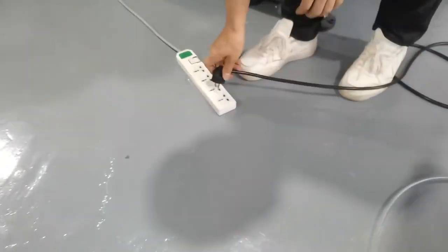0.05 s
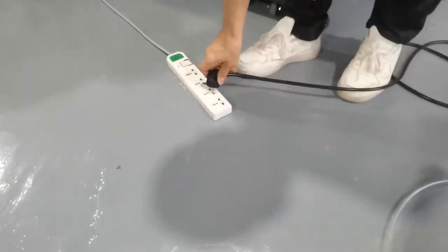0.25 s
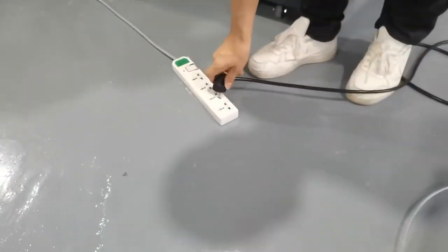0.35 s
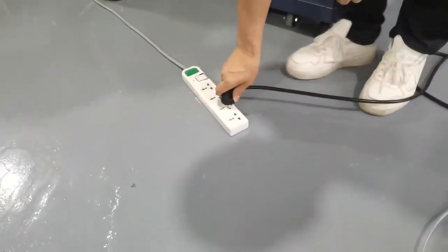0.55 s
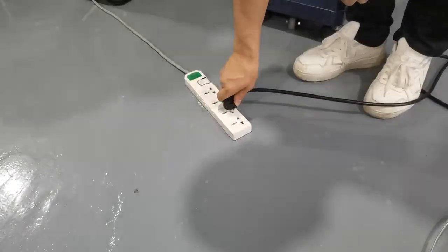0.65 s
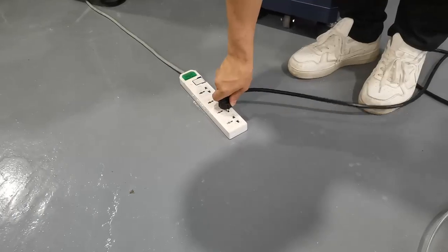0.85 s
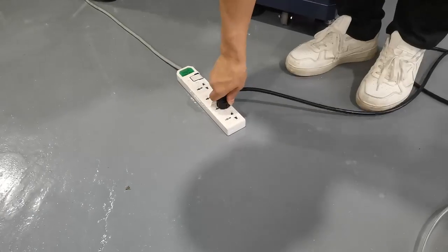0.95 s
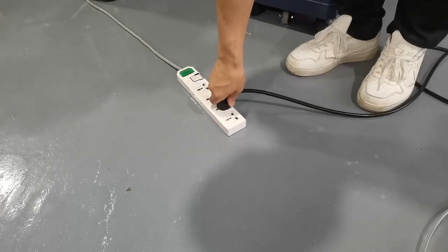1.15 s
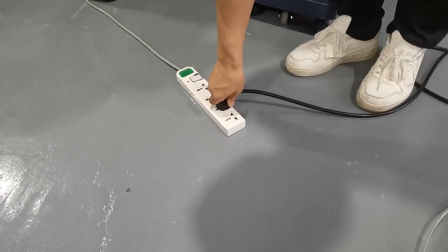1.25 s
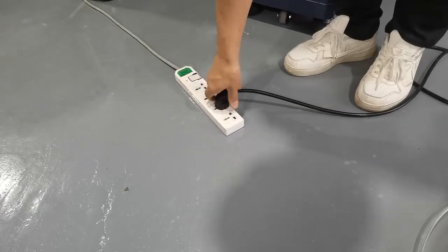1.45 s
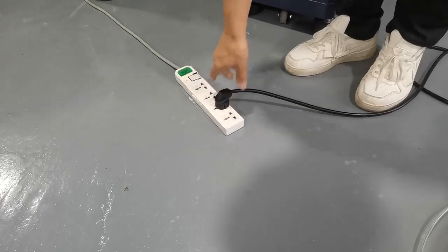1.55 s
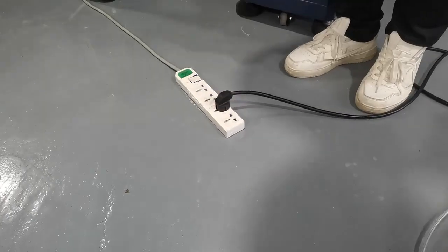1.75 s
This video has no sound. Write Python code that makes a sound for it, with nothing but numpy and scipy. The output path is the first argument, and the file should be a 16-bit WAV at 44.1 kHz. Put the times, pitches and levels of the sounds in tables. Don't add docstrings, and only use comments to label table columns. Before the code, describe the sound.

A plug scrapes and taps against a plastic power strip on a hard floor, then seats with two sharp, bright snaps that ring in a bare hall; low ventilation rumble, close phone microphone in stereo.

```python
import sys
import numpy as np
from scipy import signal
from scipy.fft import rfft, irfft, next_fast_len
from scipy.io import wavfile
from scipy.ndimage import uniform_filter1d, map_coordinates

SR = 44100
rng = np.random.default_rng(int(sys.argv[2]) if len(sys.argv) > 2 else 0)


def log_audio(samples):
    frames = np.atleast_2d(samples).T
    limited = np.clip(frames, -1, 1)
    pcm = np.round(limited * 32767).astype(np.int16)
    wavfile.write(sys.argv[1], SR, pcm)


def attenuation_scalar(level_db):
    decades = np.asarray(level_db, float) / 20
    return 10 ** decades


N = 79380


def unit(x):
    return x / np.sqrt(np.mean(x ** 2) + 1e-20)


def along(points, hz):
    f, v = np.transpose(points)
    return np.interp(np.log(hz + 1), np.log(f + 1), v)


def bumps(rows, hz):
    return sum(db / (1 + (2 * (hz - centre) / width) ** 2) for centre, width, db in rows)


def curves(rows, before_db=None):
    s, *columns = np.transpose(rows)
    return [np.interp(np.arange(N) / SR, s, c, left=before_db) for c in columns]


def sides(pan_db):
    return attenuation_scalar(np.array([pan_db / 2, -pan_db / 2]))


def wobble(rate):
    knots = rng.standard_normal(int(N * rate / SR) + 4)
    return map_coordinates(knots, [np.arange(N) * rate / SR])


def filtered(x, response):
    m = next_fast_len(N + 8192)
    return irfft(rfft(x, m) * response(np.fft.rfftfreq(m, 1 / SR)), m)[..., :N]


def add_at(out, start_s, sound):
    out[:, round(start_s * SR):][:, :sound.shape[1]] += sound


# frequency in Hz, likeness from 0 to 1.
ALIKE = [(60, 1), (150, 0.95), (400, 0.77), (1200, 0.12), (10000, 0.032)]


def rush(colour_db, patchy_db, grain=1):
    z = signal.stft(rng.standard_normal((2, N)) * grain, nperseg=512)[2]
    patches = uniform_filter1d(rng.standard_normal(z.shape[1:]), size=6, axis=0)
    patches = unit(uniform_filter1d(patches, size=10, axis=1))
    pair = signal.istft(z * attenuation_scalar(patchy_db * patches), nperseg=512)[1][:, :N]

    def mid_side_gain(hz):
        turn = np.arccos(np.clip(along(ALIKE, hz), 0, 1)) / 2
        return attenuation_scalar(colour_db(hz)) * [np.cos(turn), np.sin(turn)]

    mid, side = filtered(pair, mid_side_gain)
    return unit(np.array([mid + side, mid - side]))


def ring(modes, t, rise_s, spread):
    luck = rng.standard_normal((3, len(modes), 2, 1))
    hz, db, t60 = np.transpose(modes)[:, :, None, None]
    decay = attenuation_scalar(db + 0.77 * luck[0] - 60 * t / t60)
    tone = np.sin(2 * np.pi * hz * (1 + spread * luck[1]) * t + .5 * luck[2])
    return (decay * tone).sum(0) * (1 - np.exp(-t / rise_s))


# time in seconds, level in dB.
RUMBLE = [(0, -59.5), (.12, -56.5), (.25, -54), (.45, -62), (.58, -56.5), (.7, -57.5), (.8, -63),
          (.86, -73), (.96, -72.5), (1.05, -59.5), (1.075, -54), (1.15, -62.5), (1.24, -69), (1.38, -60.5),
          (1.55, -59), (1.63, -60), (1.72, -57), (1.8, -60)]
# frequency in Hz, level in dB per Hz.
RUMBLE_TONE = [(15, -13), (45, -9), (113, -9.5), (232, -9), (415, -12.5), (560, -21.5), (1400, -26),
               (3300, -63)]
# frequency in Hz, level over the rumble in dB.
HUM = [(110.5, 0), (165, -6.5), (418, -11), (836, -16)]
# time in seconds, level in dB.
FAN_LOAD = [(0, -13), (.2, -9), (.45, -1), (.7, 0.5), (1.05, 0), (1.3, -10.5), (1.45, 2), (1.58, 6),
            (1.8, 3)]


def ventilation():
    level_db, = curves(RUMBLE)
    load_db, = curves(FAN_LOAD)
    fan = 0
    for hz, db in HUM:
        strength = attenuation_scalar(db + 1.6 * wobble(7.54))
        cycles = np.cumsum(hz * (1 + 0.0081 * wobble(5.95))) / SR
        fan = fan + strength * np.sin(2 * np.pi * cycles)
    low = rush(lambda hz: along(RUMBLE_TONE, hz), patchy_db=1.5)
    air = attenuation_scalar(0.61 * wobble(14.0)) * low
    return attenuation_scalar(level_db) * (air + attenuation_scalar(load_db) * fan) * attenuation_scalar([[1.2], [-1.2]])


# time in seconds, level in dB.
HISS = [(0, -72), (.07, -66.5), (.7, -69), (.81, -71), (1.4, -61.5), (1.55, -58.5), (1.63, -66), (1.8, -69)]
# frequency in Hz, level in dB per Hz.
HISS_TONE = [(180, -20), (550, -8), (1660, -14.5), (3000, -8), (7000, -29), (12500, -58)]


def distant_air():
    level_db, = curves(HISS)
    return attenuation_scalar(level_db + wobble(2.0)) * rush(lambda hz: along(HISS_TONE, hz), patchy_db=1.0)


# time in seconds, level in dB, left-right difference in dB.
WASH = [(.835, -36, -12), (.88, -37, -10), (.95, -40, -8.5), (1.074, -42, -7), (1.08, -31, -23),
        (1.11, -32.5, -7), (1.16, -36, -8.5), (1.23, -38, -6.5), (1.3, -38, -5), (1.38, -43.5, -7),
        (1.47, -51, -4), (1.555, -55, -11), (1.61, -59, -10), (1.68, -49.5, -2.5), (1.74, -56, -6),
        (1.8, -60, -10)]
# frequency in Hz, level in dB per Hz.
WASH_TONE = [(290, -81), (560, -17), (910, -6), (1500, -7.5), (3300, -4), (7240, -6.5), (10500, -24),
             (12500, -35.5)]
# frequency in Hz, width in Hz, height in dB.
WASH_BODY = [(897, 140, 6.5), (2860, 690, 3.5), (7050, 250, 0), (10200, 2900, 2), (1166, 93, 5.5),
             (745, 76, 3.5)]


def hall():
    level_db, pan_db = curves(WASH, before_db=-95)
    noise = rush(lambda hz: along(WASH_TONE, hz) + bumps(WASH_BODY, hz), patchy_db=1.64)
    return attenuation_scalar(level_db - 2.64 + 0.66 * wobble(59.9)) * sides(pan_db) * noise


# time in seconds, level in dB.
CAVITY = [(.835, -49), (.86, -49), (.93, -56), (1.0, -50.5), (1.07, -50.5), (1.1, -52), (1.2, -58),
          (1.32, -52.5), (1.36, -61), (1.45, -81)]


def cavity():
    centre_hz, width_hz = 914, 110
    level_db, = curves(CAVITY, before_db=-95)

    def peak_db(hz):
        return -20 * np.log10(1 + (2 * (hz - centre_hz) / width_hz) ** 2)

    return attenuation_scalar(level_db) * rush(peak_db, patchy_db=0.8)


# start in seconds, level in dB,
# frequency in Hz, time to fade by 60 dB in seconds, left-right difference in dB.
TAPS = [(.1478, -33.5, 216, 0.013, -24), (.1478, -35, 470, 0.011, -15), (0.1995, -31, 1480, 0.0052, -38.5),
        (0.204, -52, 76, 0.046, -25), (.262, -51, 900, .03, -28), (.3275, -32.5, 4050, 0.013, -18.5),
        (0.3295, -34.5, 3300, 0.03, -23.5), (0.3334, -39.5, 3180, 0.12, -13),
        (0.5555, -33.5, 380, 0.012, 1), (0.7, -47.5, 77, 0.043, -7), (0.547, -40.5, 2010, 0.096, -17),
        (.575, -35.5, 720, 0.013, 9), (.606, -30, 2610, 0.0085, -21), (0.608, -34, 3390, 0.018, -16),
        (.609, -31.5, 830, 0.0071, 15), (1.074, -52.5, 45, 0.069, -25), (.8405, -41, 6600, 0.012, -8),
        (0.857, -38, 7400, 0.037, -14), (0.8308, -16.5, 2500, 0.0096, -13.5), (1.077, -37.5, 733, 0.066, 4),
        (1.0775, -35, 1570, .035, -6), (1.079, -38, 1900, 0.071, -2), (1.0885, -38, 1600, .02, -8),
        (1.078, -37.5, 1110, .06, 0), (1.1045, -31.5, 8100, .015, -10), (.305, -44, 875, 0.15, -6),
        (.519, -43.5, 2010, .04, -23), (.6645, -42, 3150, .02, -10), (.624, -41.5, 550, .015, 6),
        (.25, -48, 3200, .03, -17), (.251, -44, 1500, .03, -27), (1.8, -50, 3550, 0.018, -11),
        (1.3, -38, 3200, .01, -8), (.052, -47, 600, 0.027, -4), (.068, -48, 518, .05, -4),
        (.09, -49, 640, 0.072, -5), (.332, -38.5, 2800, .02, -14), (.6065, -38, 1940, .008, -8),
        (0.5, -39, 3730, .008, -10), (.655, -46.5, 570, 0.084, 3), (.8315, -27, 10800, .006, -5)]


def taps():
    out, t = np.zeros((2, N + SR)), np.arange(SR // 5) / SR
    for s, db, hz, t60, pan_db in TAPS:
        modes = [(hz * k, 0, t60) for k in (.92, 1, 1.09)]
        sound = ring(modes, t, rise_s=min(.0015, 1.36 / hz), spread=0.0282)
        sound = signal.lfilter(*signal.butter(N=2, Wn=hz / 2, btype="high", fs=SR), sound)
        add_at(out, s, attenuation_scalar(db) * sides(pan_db)[:, None] * sound)
    return out[:, :N]


# time in seconds, effort in dB, left-right difference in dB.
SCRAPE = [(0, -79, 8), (.06, -63.5, 0), (.11, -54.5, -11.5), (.22, -49, -16.5), (.26, -48, -20.5),
          (.29, -46, -13), (.345, -42.5, -11.5), (.41, -45.5, -12), (.49, -43.5, -9.5), (.555, -39.5, -10),
          (.63, -40.5, -9), (.69, -49, -10.5), (.745, -65, 4), (.82, -83, 22)]
# frequency in Hz, level in dB per Hz.
SCRAPE_TONE = [(150, -47), (300, -7.5), (752, -3.5), (1560, -6), (4050, -4), (7030, -7.5), (10500, -26),
               (12500, -30.5)]
# frequency in Hz, width in Hz, height in dB.
SCRAPE_BODY = [(723, 200, -0.5), (2040, 330, 2.5), (3320, 160, 4), (1500, 520, -1), (470, 100, -3)]


def scrape():
    grains_per_s, grain_spread_db, grain_db = 1500, 2.5, -9
    effort_db, pan_db = curves([*SCRAPE, (.84, -70, 0.0039)])
    struck = rng.random(N) < grains_per_s / SR
    hits = struck * attenuation_scalar(grain_spread_db * np.minimum(rng.exponential(size=N), 4))
    grain = 1 + attenuation_scalar(grain_db) * unit(uniform_filter1d(hits, size=12))
    noise = rush(lambda hz: along(SCRAPE_TONE, hz) + bumps(SCRAPE_BODY, hz), patchy_db=2.0, grain=grain)
    return attenuation_scalar(effort_db + 2.55 + 0.43 * wobble(38.9)) * sides(pan_db) * noise


# start in seconds, level in dB, left-right difference in dB.
KNOCKS = [
    (.8325, -22.5, -3.5),
    (0.8393, -31, -1),
    (1.077, -21.5, 3),
    (1.0885, -33, 2),
    (1.097, -29.5, 2),
]
# frequency in Hz, level in dB, time to fade by 60 dB in seconds.
HOUSING = [(900, -3, .052), (1430, -14, .04), (720, -22, .04)]


def knocks():
    out, t = np.zeros((2, N + SR)), np.arange(SR // 5) / SR
    for s, db, pan_db in KNOCKS:
        sound = ring(HOUSING, t, rise_s=.002, spread=0.013)
        add_at(out, s, attenuation_scalar(db) * sides(pan_db)[:, None] * sound)
    return out[:, :N]


# start in seconds, level in dB, left-right difference in dB.
SNAPS = [(.8292, -30, -4), (0.831, -13.5, -12.5), (0.8313, -16, -15), (0.8343, -23.5, -14),
         (1.0755, -15.5, -11), (1.0773, -13, 1.5), (1.0794, -14, -14), (1.0808, -25, -11),
         (1.0838, -20, -4), (1.0895, -34, -4), (1.0925, -36, 15), (1.0991, -27, -10)]
# frequency in Hz, level in dB, time to fade by 60 dB in seconds.
PRONGS = [(2150, -4, 0.0084), (2817, 1, .012), (3570, -0.5, 0.013), (4400, -1.5, 0.01), (5050, -9, 0.006),
          (6570, -4.5, 0.012), (7330, -7, 0.0059), (7970, 0, 0.0092), (9340, -2.5, 0.0075),
          (10400, -7.5, 0.0072)]


def snaps():
    crack_s, crack_db = 0.0063, -3
    near_s, near_db = 0.052, -23
    out, near, t = np.zeros((2, N + SR)), np.zeros((2, N + SR)), np.arange(SR // 5) / SR
    for s, db, pan_db in SNAPS:
        bright_noise = np.diff(rng.standard_normal((2, len(t) + 1)))
        crack = 0.32 * bright_noise * attenuation_scalar(crack_db - 60 * t / crack_s)
        sound = 0.42 * ring(PRONGS, t, rise_s=0.0003, spread=0.04) + crack
        add_at(out, s, attenuation_scalar(db) * sides(pan_db)[:, None] * sound)
        add_at(near, s, attenuation_scalar(db + near_db - 60 * t / near_s) * sides(pan_db / 2)[:, None])
    scatter = near[:, :N] * rush(lambda hz: along(WASH_TONE, hz), patchy_db=1.5)
    return out[:, :N] + scatter


def scene():
    background = ventilation() + distant_air() + hall() + cavity()
    return background + taps() + scrape() + knocks() + snaps()


def gate(x):
    under_db, top_db, depth_db = -3.8, -62.5, -50
    hz, _, z = signal.stft(x, SR, nperseg=1024, noverlap=768)
    hz, frames = hz[:, None], z.shape[2]
    power = uniform_filter1d(np.mean(np.abs(z) ** 2, 0), size=7, axis=1)
    band = 10 * np.log10(np.abs(uniform_filter1d(power, size=7, axis=0)) + 1e-16)
    over = band - uniform_filter1d(band, size=61, axis=0)
    over = np.repeat(np.repeat(over[3::6, 2::4], 6, 0), 4, 1)
    over = np.pad(over, [(0, 8), (0, 8)])[:z.shape[1], :frames]
    now = 10 * np.log10(np.abs(uniform_filter1d(np.abs(z) ** 2, size=15, axis=1)) + 1e-16)
    top_hz, drift_hz = np.array([[9500, 11600], [300, 130]])[:, :, None, None]
    edge = top_hz + drift_hz * np.repeat(rng.standard_normal(frames // 8 + 1), 8)[:frames]
    whim = unit(uniform_filter1d(rng.standard_normal(frames), size=9))
    quiet = power.sum(0) < attenuation_scalar(-72)
    weak = (over < under_db + whim) & (hz > 1650) & quiet
    shut = np.where(hz > edge, now < top_db, weak)
    return signal.istft(z * attenuation_scalar(depth_db * shut), SR, nperseg=1024, noverlap=768)[1][:, :N]


def band_limit(x):
    return signal.sosfilt(signal.butter(12, 13010, fs=SR, output="sos"), x)


# frequency in Hz, left-right difference in dB.
PORTS = [(500, 2.5), (1500, 11), (3000, 5.5), (5000, 4.5), (7500, 10.5), (9500, -0.5), (10500, -8.5),
         (12500, -1)]
# frequency in Hz, width in Hz, height in dB.
NOTCHES = [(5630, 590, -8.5), (8320, 680, -7), (1733, 86, -2), (2270, 90, -2)]


def record(dry):
    def colour(hz):
        top_limit = 1 / (1 + (hz / 12500) ** 40)
        return sides(along(PORTS, hz)) * attenuation_scalar(bumps(NOTCHES, hz)) * top_limit

    return band_limit(gate(filtered(dry, colour)))


dry = scene()
out = record(dry)
log_audio(out)
```